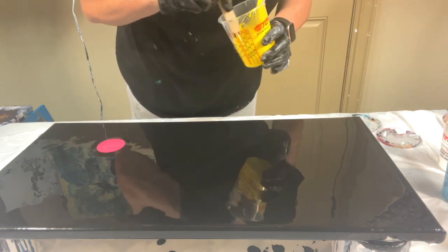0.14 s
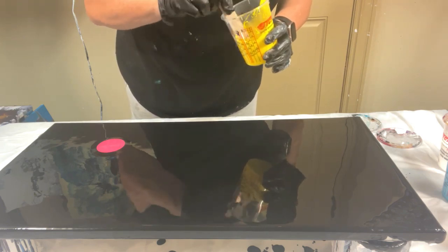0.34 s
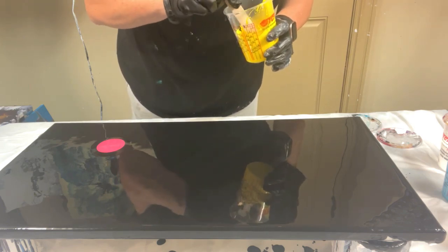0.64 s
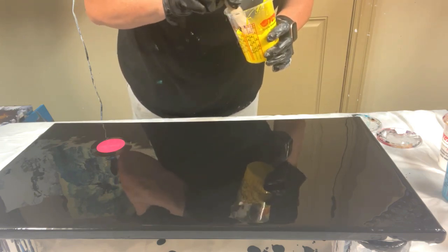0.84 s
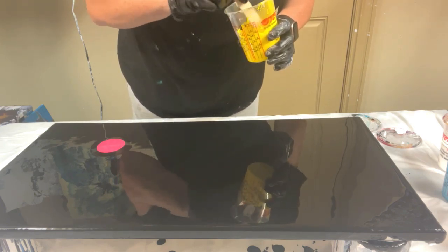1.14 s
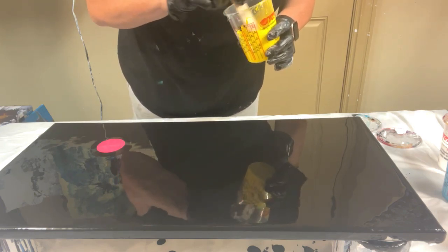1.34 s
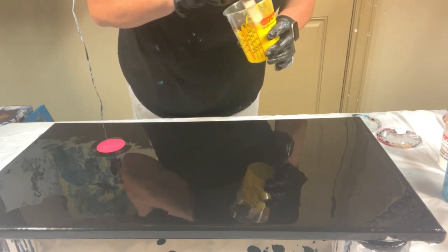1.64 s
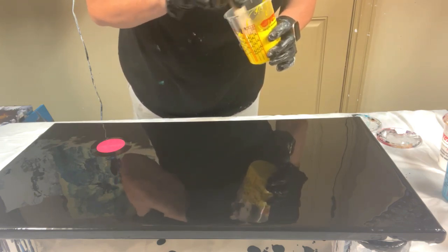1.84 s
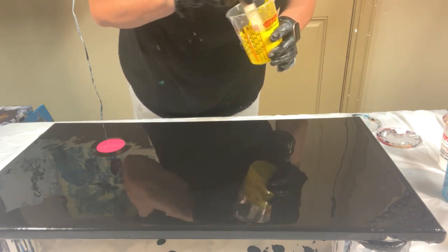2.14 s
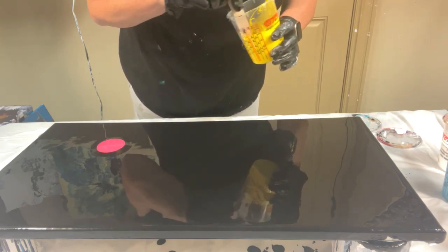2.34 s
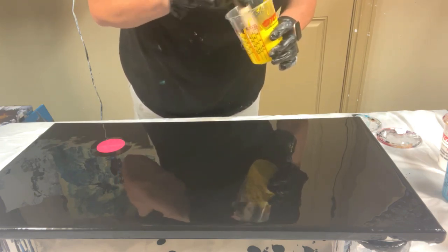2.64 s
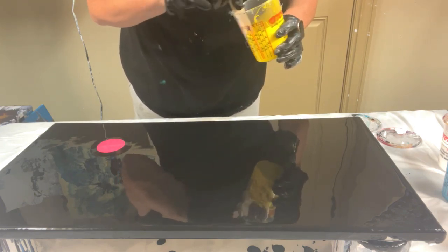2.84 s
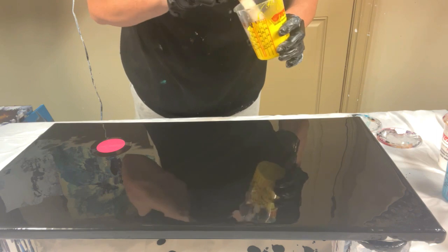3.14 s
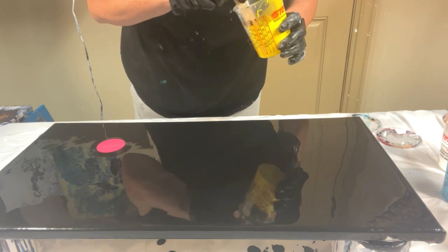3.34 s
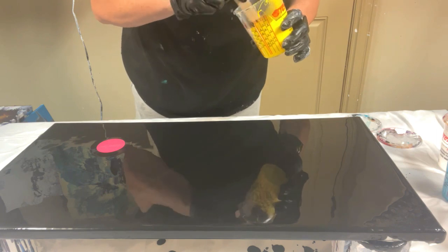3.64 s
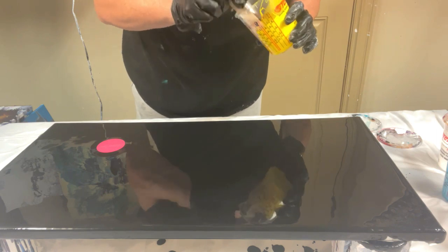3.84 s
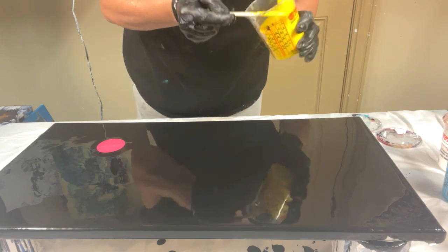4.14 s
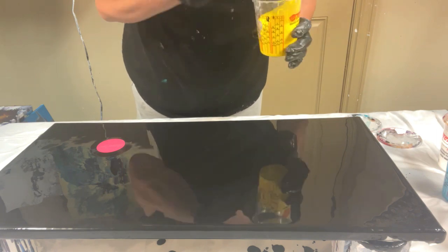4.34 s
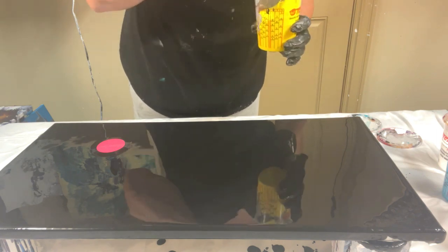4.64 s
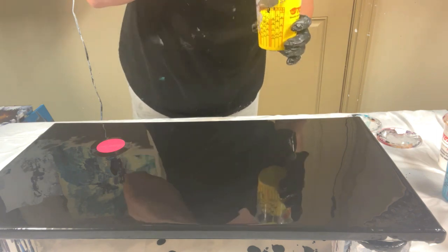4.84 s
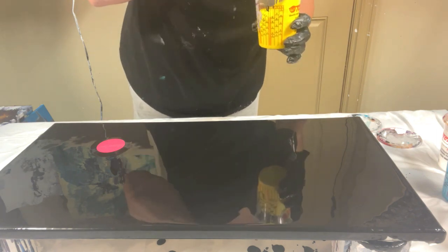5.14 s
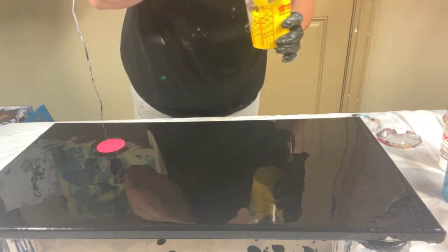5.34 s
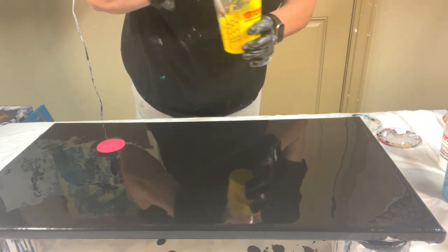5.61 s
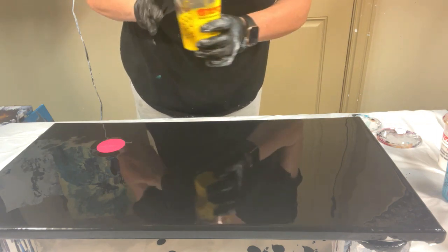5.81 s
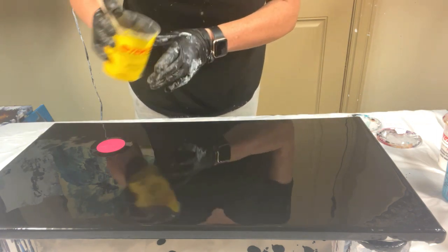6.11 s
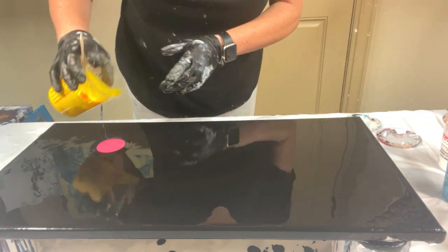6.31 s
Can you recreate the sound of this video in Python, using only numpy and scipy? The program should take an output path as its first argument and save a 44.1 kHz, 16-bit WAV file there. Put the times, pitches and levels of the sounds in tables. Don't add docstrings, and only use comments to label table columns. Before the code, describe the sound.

A wooden stick stirs thin paint in a plastic cup, knocking and clicking the sides over a low indoor hum, then taps the rim.

```python
import sys
import numpy as np
from scipy import signal
from scipy.fft import rfft, irfft, next_fast_len
from scipy.io import wavfile
from scipy.ndimage import uniform_filter1d

SR = 44100
rng = np.random.default_rng(int(sys.argv[2]) if len(sys.argv) > 2 else 0)


def file_out(sig):
    cols = np.atleast_2d(sig).T
    lim = np.clip(cols, -1, 1)
    pcm = np.round(lim * 32767).astype(np.int16)
    wavfile.write(sys.argv[1], SR, pcm)


def boost(x):
    u = np.asarray(x, float) / 20
    return 10 ** u


N = 285503
M = next_fast_len(N)


# start_s, air_db, base_db, stick_db
STIR_KNOCKS = [(.205, -53.5, -65, -62), (.3, -62, -58, -66), (.355, -65.5, -58, -75), (.561, -60, -60, -59),
               (.694, -58.5, -58.5, -59), (.794, -62.5, -75, -65), (.844, -64.5, -63, -75),
               (.949, -66, -81, -64), (1.013, -55, -55.5, -50.5), (1.169, -62, -72, -62.5),
               (1.304, -62, -59, -76), (1.424, -52, -50, -60), (1.509, -59, -82, -67),
               (1.694, -49.5, -59.5, -52.5), (1.954, -56.5, -78, -61.5), (2.23, -58, -74, -60.5),
               (2.309, -64, -59, -66), (2.757, -52, -68, -68), (2.952, -63.5, -83, -69),
               (3.179, -56, -63, -59), (3.25, -55.5, -61, -68)]
# start_s, air_db, base_db, stick_db, stick_centre_hz
RIM_KNOCKS = [(3.482, -58.5, -56, -51, 1670), (3.522, -59, -56, -54, 1000), (3.567, -48, -51, -51.5, 1070),
              (3.74, -64, -57, -52.5, 1710), (3.835, -45, -49.5, -52, 1070), (3.894, -57.5, -68, -65, 1000),
              (3.925, -66, -66, -56, 1340), (4.034, -68, -65, -59, 1180), (4.062, -64, -59.5, -62, 1000),
              (4.118, -64, -60, -64, 1110), (5.4, -67, -53.5, -49, 1210), (5.515, -57.5, -57, -52.5, 1700),
              (5.564, -60, -59.5, -55, 1180), (5.979, -52.5, -57, -59, 1210), (5.992, -48, -57, -51, 1010)]
# pitch_hz, time_to_fall_60_db_s, level_db
AIR = [(822, .075, -1), (870, .07, -6), (892, .098, 0), (950, .04, -7)]
# pitch_hz, time_to_fall_60_db_s, level_db
BASE = [(448, 0.047, -10), (535, 0.033, -1), (648, 0.02, 1.5)]
# pitch_hz, time_to_fall_60_db_s, level_db
STICK = [(1070, 0.017, 4), (1275, 0.018, 0), (1426, 0.022, -7.5), (1765, 0.018, -4)]
WALL_FALL_DB = 23.


def knocks():
    shell, column = np.zeros((2, N + SR))
    stir_stick_hz = 1205
    rows = [(*row, stir_stick_hz) for row in STIR_KNOCKS] + list(RIM_KNOCKS)
    chance = rng.standard_normal((len(rows), 2, 3, 4, 3))
    # delay s, air dB, base and stick dB
    landings = [(0, 0, 0), (.011, -3.5, -6.5)]
    for (s, air_db, base_db, stick_db, stick_hz), both in zip(rows, chance):
        for (late_s, less_air_db, less_db), luck in zip(landings, both):
            start_s = s + late_s
            air_luck = luck[2] * [.5, 1.5, 1]
            add(column, start_s, boost(air_db + less_air_db) * ring(AIR, air_luck))
            add(shell, start_s, boost(base_db + less_db) * ring(BASE, luck[0]))
            add(shell, start_s, boost(stick_db + less_db) * ring(STICK, luck[1], stick_hz, WALL_FALL_DB))
    return shell[:N], column[:N]


def ring(modes, chance=np.array([[0, 0, 1]]), centre_hz=None, fall_db=0):
    detune, scatter_db = .012, 2.
    hz, t60, db = np.transpose(modes)[:, :, None]
    t = np.arange(int(SR * t60.max())) / SR
    pitch_luck, level_luck, sign_luck = chance[:len(modes)].T[:, :, None]
    if centre_hz:
        db = db - fall_db * np.abs(np.log2(hz / centre_hz))
    waves = np.sin(2 * np.pi * hz * (1 + detune * pitch_luck) * t)
    waves *= np.exp(-np.log(1000) * t / t60)
    waves *= 1 - np.exp(-t * hz)
    out = np.sum(np.sign(sign_luck) * boost(db + scatter_db * level_luck) * waves, axis=0)
    return out / np.abs(out).max()


def add(track, s, sound):
    start = int(s * SR)
    track[start:start + len(sound)] += sound


# start_s, wall_db, wall_centre_hz, tick_db
STIR_CLICKS = [(0.054, -60.5, 2870, -77), (.2044, -58.5, 2290, -69), (0.3465, -59, 2270, -75),
               (.488, -55.5, 2190, -65), (.5004, -59, 2260, -59), (.5598, -64, 2850, -71),
               (.5738, -59, 2380, -56), (0.6822, -49, 2120, -55), (0.6959, -46.5, 2290, -53.5),
               (.715, -73, 2840, -53), (.938, -50.5, 2600, -59.5), (1.0133, -58, 2320, -57),
               (1.029, -54, 2860, -54), (1.052, -57, 2290, -55.5), (1.1683, -53, 2590, -59),
               (1.2892, -59.5, 1930, -57.5), (1.422, -50.5, 2430, -55.5), (1.4347, -52.5, 2700, -65),
               (1.499, -54.5, 2340, -70), (1.692, -46.5, 2260, -61), (1.702, -52, 2600, -47.5),
               (1.7612, -54, 2340, -59.5), (1.8139, -60, 2300, -55.5), (1.957, -55, 2330, -56),
               (2.0236, -54, 2370, -66), (2.0784, -55.5, 2370, -60), (2.2284, -48.5, 2180, -62),
               (2.294, -58.5, 2330, -74), (2.7546, -53.5, 2260, -56.5), (3.044, -53.5, 2060, -76)]
# start_s, wall_db, wall_centre_hz,
# tick_db, tick_centre_hz
RIM_CLICKS = [(3.1747, -52, 2370, -48, 4800), (3.4801, -45.5, 2900, -57, 4200),
              (3.5214, -54.5, 2100, -66, 4000), (3.565, -54.5, 1680, -69, 3880),
              (3.7414, -46.5, 3030, -54.5, 4000), (3.8152, -59, 1840, -61, 4720),
              (3.8357, -55, 1630, -64, 4260), (4.0347, -56, 2900, -54.5, 4640),
              (4.0622, -55.5, 2270, -56, 4080), (5.3594, -71, 1730, -58, 4480),
              (5.4017, -47, 2060, -49.5, 3900), (5.5139, -50.5, 2000, -53, 4180),
              (5.5634, -58, 1900, -60, 4330), (5.6213, -57, 1850, -48, 6500),
              (5.6324, -50, 2030, -51, 6400), (5.64, -67, 2520, -42, 6800), (5.7188, -72, 2130, -60, 4500),
              (5.786, -80, 2260, -62, 8000), (5.8857, -78, 3310, -56, 5190), (5.9438, -55, 2800, -68, 5010),
              (5.9663, -58, 3430, -52, 4590), (5.9926, -48.5, 2600, -41, 5230)]
# pitch_hz, time_to_fall_60_db_s, level_db
WALL = [(1770, 0.017, 2.5), (1924, 0.011, 5), (2227, 0.019, -1.5), (2370, 0.018, -0.5), (2600, 0.028, -4.5),
        (2833, 0.027, -5), (3044, 0.022, -6), (3290, 0.012, 8)]
# pitch_hz, time_to_fall_60_db_s, level_db
TICK = [(3800, 0.036, -3.5), (4120, 0.016, -10.5), (4220, 0.012, 2.5), (4784, 0.063, -10.5),
        (5200, 0.016, -6.5), (5710, 0.035, -6.5), (6340, 0.012, -4.5), (6360, 0.042, -5),
        (6980, 0.011, 7.5), (7860, 0.011, 0), (8900, 0.0033, -30)]


def blows():
    out = np.zeros(N + SR)
    stir_tick_hz, tick_fall_db = 4580, 12.
    rows = [(*row, stir_tick_hz) for row in STIR_CLICKS] + list(RIM_CLICKS)
    chance = rng.standard_normal((len(rows), 2, 11, 3))
    noise = rng.standard_normal((len(rows), 400))
    for (s, wall_db, wall_hz, tick_db, tick_hz), luck, hiss in zip(rows, chance, noise):
        add(out, s, boost(wall_db) * ring(WALL, luck[0], wall_hz, WALL_FALL_DB))
        add(out, s, boost(tick_db) * ring(TICK, luck[1], tick_hz, tick_fall_db))
        crack_level = boost(wall_db - 15.5) + boost(tick_db - 10.5)
        add(out, s, crack_level * crack(hiss))
    return out[:N]


def crack(noise):
    decay_s, band_hz = 0.0018, (800, 6500)
    burst = noise * np.exp(-np.arange(len(noise)) / SR / decay_s)
    burst = signal.sosfilt(signal.butter(4, band_hz, "band", fs=SR, output="sos"), burst)
    return burst / np.abs(burst).max()


# time_s, pressure_db
DRAG = [
    [(0, 5.5), (.2, -1), (.6, -4), (.92, -0.5), (1.1, -4), (1.6, 1.5), (2.1, 2), (2.75, 4), (3.35, -4)],
    [(3.44, -13), (3.58, -2.5), (3.71, -25), (3.83, -0.5), (3.98, -5.5), (4.05, -8), (4.17, 1.5),
     (4.28, -37)],
    [(5.33, -29), (5.41, 6.5), (5.57, -6), (5.75, -34), (5.96, 6), (6.11, 2), (6.3, -6)],
    [(5.4, -24), (5.6, 10), (5.625, 16), (5.66, -6), (5.74, 2), (5.9, -16)],
    [(.08, -16), (.13, -2), (.195, 0), (.22, -27), (1.85, -23), (1.95, -4.5), (2.3, -14), (2.54, 0),
     (2.64, -13)],
]
# air_db, wall_db, wet_rasp_db, swish_db
DRAG_MIX = [
    (-79.5, -84, -81, -93.5),
    (-74.5, -76.5, -71.5, -96),
    (-83.5, -83, -73.5, -105),
    (-99, -92, -88, -80.5),
    (-99, -82, -99, -99),
]
# pitch_hz, time_to_fall_60_db_s, level_db
RASP = [(1520, 0.0017, -6), (3200, 0.0024, 7.3), (3740, 0.0052, 0), (4500, 0.0033, -1.5)]
# pitch_hz, time_to_fall_60_db_s, level_db
SWISH = [(5530, 0.0018, -1.5), (6500, 0.0039, 14), (6900, 0.0025, -0.5), (8200, 0.0012, -6)]


def drag():
    t = np.arange(N) / SR
    touch = []
    for curve in DRAG:
        pressure_db = np.interp(t, *np.transpose(curve), left=-99, right=-99)
        touch.append(uniform_filter1d(boost(pressure_db), size=SR // 50))
    turn_s, first_turn_s, swell_db = .259, 0.18, 1.5
    touch[0] = touch[0] * boost(swell_db * np.cos(2 * np.pi * (t - first_turn_s) / turn_s))

    slip_db = 3. * np.minimum(rng.exponential(size=N), 6)
    stutter_db = 3. * walk(60)
    grains = level(rng.standard_normal(N) * boost(slip_db + stutter_db), 0)

    skid_db = np.array([-38, -34.5, -23, -31])
    pushes = boost(np.transpose(DRAG_MIX)) @ touch + np.outer(boost(skid_db), skid(t))
    out = np.zeros(N)
    for modes, push in zip((AIR, WALL[2:4], RASP, SWISH), pushes):
        body = ring(modes)
        body = body / np.sqrt(np.sum(body ** 2))
        out += signal.oaconvolve(grains * push, body)[:N]
    return out


def skid(t):
    decay_s = 0.021
    s, db = np.transpose([(row[0], row[3]) for row in list(STIR_CLICKS) + list(RIM_CLICKS)])
    jumps = np.bincount((s * SR).astype(int), boost(db), minlength=N)
    return signal.oaconvolve(jumps, np.exp(-t[:SR // 4] / decay_s))[:N]


def walk(rate):
    k = int(SR / rate)
    held = np.repeat(rng.standard_normal(N // k + 1), k)
    slewed = uniform_filter1d(uniform_filter1d(held, k), k)[:N]
    return slewed / slewed.std()


def level(x, db):
    return x * boost(db) / np.sqrt(np.mean(x ** 2))


def room(x):
    room_db, t60_s, treble_t60_s, treble_db = -4, 0.28, 0.19, -1.5
    split_hz, gap_s = 3500, 0.0065
    t = np.arange(SR // 2) / SR
    noise = rng.standard_normal((2, len(t)))
    low = signal.sosfilt(signal.butter(2, split_hz, fs=SR, output="sos"), noise)
    low_tail = low * np.exp(-np.log(1000) * t / t60_s)
    treble_tail = boost(treble_db) * (noise - low) * np.exp(-np.log(1000) * t / treble_t60_s)
    tail = (low_tail + treble_tail) * (t > gap_s)
    tail *= boost(room_db) / np.sqrt(np.sum(tail ** 2, axis=1, keepdims=True))
    return signal.fftconvolve(x[None], tail, axes=1)[:, :N]


# pitch_hz, level_db, left_minus_right_db, left_lead_rad, in_step_with_neighbours_s
HUM = [(50.47, -64.0, 1.3, .35, 3.14), (53.41, -57.8, 1.1, .37, 3.14), (57.77, -66.3, -2.7, -.15, 3.14),
       (58.66, -68.4, 9.6, -.07, 3.14), (106.81, -68.5, 1.5, .27, .935), (115.54, -58.1, -2.2, .45, .935),
       (117.43, -66.8, 1.8, .61, .935), (119.98, -51.3, 2.1, .5, .935), (222.2, -78, 3, 0, .935),
       (240, -75, 7, -1.54, .935), (257.8, -80, 3, 0, .935)]


def hum():
    hz, db, pan_db, lead, in_step_s = np.transpose(HUM)[:, :, None]
    turn = 2 * np.pi * hz * (np.arange(N) / SR - in_step_s)
    ports = []
    for side in (1, -1):
        tones = boost(db + side * pan_db / 2) * np.cos(turn + side * lead / 2)
        ports.append(np.sum(tones, axis=0))
    return np.sqrt(2) * np.array(ports)


# pitch_hz, level_db (per Hz)
RUMBLE = [(22, -101), (30, -95), (41, -94.5), (48, -72), (62, -73), (71, -65), (84, -81.5), (94, -72),
          (103, -70.5), (130, -70), (143, -77), (156, -76), (190, -73), (215, -81.5), (310, -92)]
# pitch_hz, level_db (per Hz)
HISS = [(200, -30), (330, -6), (700, -13), (1000, -25), (1500, -24), (2000, -21), (3000, -23), (4700, -21),
        (6800, -25), (8400, -39), (9500, -48.5), (11500, -51.5), (13600, -52.5), (17000, -65)]


def air_noise(hz):
    hiss = diffuse(HISS, -68, hz) * boost(0.41 * walk(1.2))
    rumble = diffuse(list(RUMBLE) + [(400, -130)], -51.5, hz)
    return hiss + rumble


# pitch_hz, likeness_0_to_1, left_lead_rad, left_minus_right_db
PORTS = [(54.4, 1, 0, 1.5), (133, 0.93, 1.32, 4.5), (274, 0.08, 2.1, 4.5), (523, 0.2, 0.68, 3.5),
         (890, 0, 1, 4.5), (2000, 0, 0.3, 5), (4930, 0.3, 0, 6.5), (7840, 0, 2.3, 4.5),
         (10600, 0.03, 0.37, 2)]


def diffuse(spectrum, db, hz):
    lag_s = .00046
    a, b = rfft(rng.standard_normal((2, M))) * boost(on_log(hz, spectrum, column=1))
    like = np.clip(on_log(hz, PORTS, column=1), 0, 1)
    lead = on_log(hz, PORTS, column=2) - 2 * np.pi * hz * lag_s
    right = like * a * np.exp(-1j * lead) + np.sqrt(1 - like ** 2) * b
    return level(irfft([a, right], M)[:, :N], db)


def on_log(hz, table, column):
    table = np.array(table, float)
    return np.interp(np.log(hz + 1), np.log(table[:, 0]), table[:, column])


# pitch_hz, delay_s
CUP_LAG = [(1000, 0.00017), (1500, 0.000024), (3300, 0.000051), (4000, .0002)]


def scene():
    hz = np.fft.rfftfreq(M, 1 / SR)
    shell, column = knocks()
    shell = shell + blows() + drag()
    cup = rfft(shell + column, M)
    left_cup = cup * np.exp(-2j * np.pi * hz * on_log(hz, CUP_LAG, column=1))
    direct = irfft([left_cup, cup], M)[:, :N]
    echo = room(shell + boost(-4.5) * column)
    tilt = boost(on_log(hz, PORTS, column=3) / 2)
    heard = rfft(direct + echo + air_noise(hz), M) * [tilt, 1 / tilt]
    return irfft(heard, M)[:, :N] + hum()


def low_pass(x):
    return signal.sosfilt(signal.butter(12, 13800, fs=SR, output="sos"), x)


def record(dry):
    top_hz, side_top_hz = 13800, 11250
    dry = signal.sosfiltfilt(signal.butter(12, top_hz, fs=SR, output="sos"), dry)
    side = (dry[0] - dry[1]) / 2
    dropped = signal.sosfiltfilt(signal.butter(8, side_top_hz, "high", fs=SR, output="sos"), side)
    mix = dry - dropped * [[1], [-1]]
    return low_pass(mix)


dry = scene()
out = record(dry)
file_out(out)
```